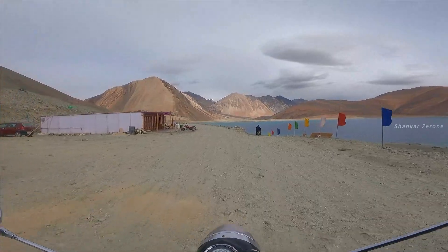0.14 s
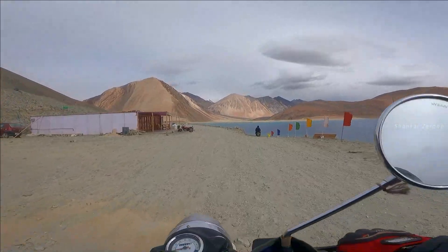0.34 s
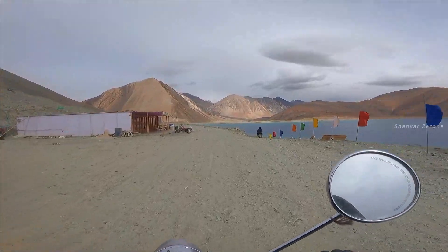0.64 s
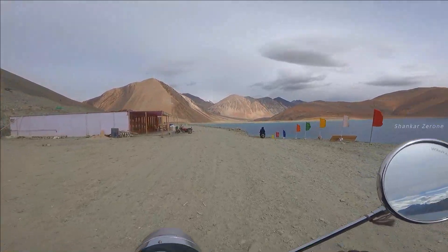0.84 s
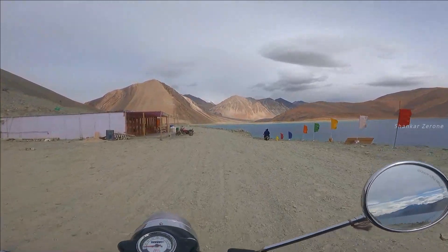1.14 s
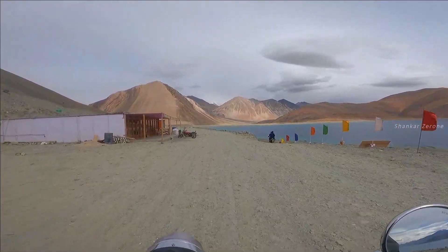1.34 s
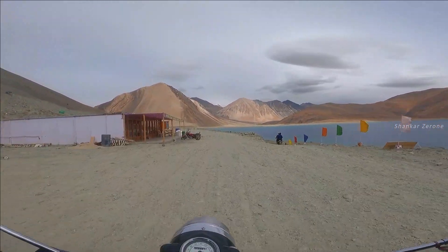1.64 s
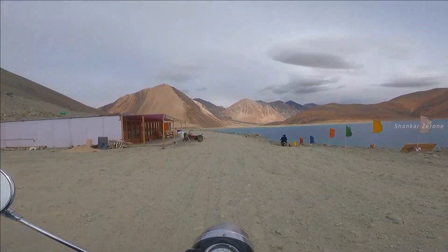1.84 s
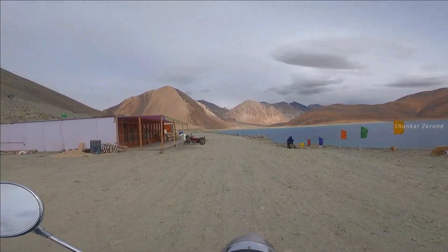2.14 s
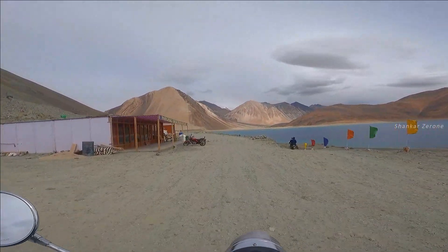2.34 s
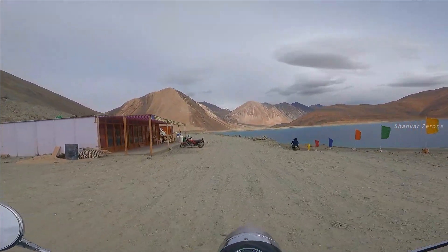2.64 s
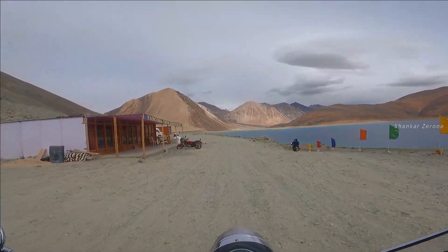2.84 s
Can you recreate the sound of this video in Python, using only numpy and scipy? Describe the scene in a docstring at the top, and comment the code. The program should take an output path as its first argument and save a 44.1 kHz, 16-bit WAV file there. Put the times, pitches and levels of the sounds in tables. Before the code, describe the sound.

A single-cylinder motorcycle thumps close by, slow and low, with light valve clatter, over rumbling, crunching tyres and wind buffeting the microphone. Bumps give dull thuds in the first half second. From about 0.7 to 1.2 seconds the engine softens and stones click sharply against the metal. After 1.8 seconds the throttle opens and the beat grows louder and faster until 3 seconds, with a gravel scrape and pebble snaps.

```python
"""A gravel track, from the rider's seat of a big single-cylinder motorcycle plodding along.
Close by, each slow firing thumps the exhaust and puffs gas, and the valve gear clacks;
after 1.8 s the throttle opens and the beat quickens. Below, the tyres rumble and crunch,
pebbles snap and stones tick against the bike. Air buffets the microphone into its limiter."""
import sys
import numpy as np
from scipy import signal
from scipy.fft import rfft, irfft
from scipy.io import wavfile
from scipy.ndimage import uniform_filter1d, minimum_filter1d

SR = 44100
rng = np.random.default_rng(int(sys.argv[2]) if len(sys.argv) > 2 else 0)


def to_wav(s):
    """Save 16-bit WAV."""
    ch = np.atleast_2d(s).T  # columns
    pcm = np.round(np.clip(ch, -1, 1) * 32767)  # PCM
    wavfile.write(sys.argv[1], SR, pcm.astype(np.int16))


N = 132300

# wind on the microphone: time_s, level_db
WIND_LEVEL = [(0, -26), (.1, -22), (.19, -9.5), (.3, -18), (.44, -12), (.54, -11), (.64, -25), (1.0, -19),
              (1.3, -23), (1.57, -17), (1.7, -27), (1.88, -16), (1.98, -12), (2.08, -22), (2.45, -16),
              (2.7, -15), (3, -18)]
# tyres rolling: time_s, level_db
ROLLING_LEVEL = [(.02, -19), (.1, -23), (.21, -19), (.28, -27.5), (.36, -22.5), (.46, -20.5), (.55, -20.5),
                 (.61, -26), (.78, -23), (1.0, -21.5), (1.1, -25.5), (1.2, -22.5), (1.45, -27.5),
                 (1.54, -23), (1.62, -28.5), (1.71, -28.5), (1.81, -23.5), (2.0, -25), (2.18, -29),
                 (2.26, -21.5), (2.45, -22), (2.59, -26.5), (2.78, -20.5), (2.88, -30), (2.94, -22)]
# gravel crunching: time_s, level_db
GRAVEL_LEVEL = [(.05, -47.5), (.19, -46.5), (.28, -39.5), (.36, -45.5), (.5, -47), (.68, -49.5),
                (.8, -43.5), (.92, -46), (1.06, -53.5), (1.2, -39), (1.26, -51), (1.38, -43), (1.5, -49),
                (1.69, -52.5), (1.77, -40.5), (1.83, -40), (1.93, -49.5), (2.16, -48.5), (2.28, -48.5),
                (2.44, -44), (2.58, -46.5), (2.76, -43.5), (2.89, -48), (2.95, -42.5)]
# sprays of grit: start_s, level_db, decay_s
GRIT_SPRAYS = [(0, -59.5, .3), (.228, -52, .08), (.45, -64.5, 0.12), (.574, -60, 0.32), (.7, -52, 0.033),
               (.75, -58, 0.093), (1.11, -56, 0.1), (1.744, -60.5, 0.059)]
# thin squeal: time_s, level_db
SQUEAL_FADE = [(0, -63), (.18, -65), (.26, -78), (.35, -110)]
# engine speed: time_s, firing_rate_hz
FIRING_RATE = [(0, 8.19), (.35, 8.11), (.63, 7.25), (.85, 7.55), (1.35, 7.21), (1.83, 7.54), (2.05, 9.95),
               (2.45, 11.93), (3.0, 14.54)]
# strength of the firings: time_s, gain_db
FIRING_STRENGTH = [(.05, -3), (.17, -3), (.42, -5), (.55, -4.5), (.7, -10), (1.1, -11), (1.36, -4.5),
                   (1.5, -9.5), (1.63, -8.5), (1.76, -4.5), (1.89, -0.5), (2.0, -3), (2.2, 3.5), (2.29, 4),
                   (2.47, 5.5), (2.56, 0), (2.7, 2.5), (2.82, -3), (2.93, 1)]
# exhaust pipe resonances: pitch_hz, gain_db, t60_s
PIPE_MODES = [(56, -2.5, 0.094), (91.2, 4.5, 0.057), (120.8, -3.5, 0.13)]
# valve-gear clacks: cycle_share, gain_db
VALVE_CLACKS = [(.29, -30.5), (.38, -34)]
# the frame thudding over bumps: start_s, level_db, decay_s
FRAME_THUDS = [(.155, -16, .025), (.205, -9, 0.026), (0.391, -9.5, 0.028), (.485, -13, 0.018),
               (.75, -19.5, 0.019), (2.23, -18, .03)]
# short high metallic chinks: start_s, pitch_hz, level_db, decay_s
METALLIC_CHINKS = [(.232, 8000, -48, .008), (0.575, 4100, -43, 0.0046), (.668, 2580, -43, 0.0049),
                   (0.953, 2860, -16, 0.0021), (1.016, 4000, -43, 0.0061), (1.199, 4950, -31, 0.0014),
                   (2.488, 8200, -58, .005), (2.631, 7400, -55, .003), (2.648, 7700, -55, .004),
                   (2.724, 7850, -52, 0.0045), (2.802, 8100, -59, .004), (2.872, 7700, -56, .003)]
# stones striking the bike: start_s, tick_db, knock_db
STONE_HITS = [(0.7283, -18.5, -16.5), (0.8514, -34, -24), (.953, -22, -22), (1.031, -51, -42),
              (1.1063, -24.5, -32), (1.1686, -38, -32.5), (1.191, -46, -32), (1.208, -55, -30.5),
              (1.217, -46, -48), (2.4183, -42, -50)]
# struck metalwork resonances: pitch_hz, relative_to_knock_db, t60_s
METAL_MODES = [(1066, -10.5, .045), (1450, -7, .045), (2070, -14.5, 0.019), (2680, -15, .016),
               (3160, -13.5, .014), (3570, -16, 0.02), (4000, -20.5, 0.017), (4750, -19, .013),
               (5420, -20, .013), (7750, -14, .008)]
# tyres scraping through loose gravel: start_s, end_s, level_db
TYRE_SCRAPES = [(0.744, 1.03, -35), (2.22, 2.486, -32.5)]
# pebbles under the tyres: start_s, peak_db, tilt_db_per_octave
PEBBLE_SNAPS = [(1.1958, -26, 3), (1.406, -33, 3), (1.597, -27, -2), (1.747, -30, -5), (1.837, -31, -5),
                (2.025, -31, -4.5), (2.4323, -22.5, -1)]

# The tone of each source at the microphone: frequency_hz, relative_density_db
WIND_SPECTRUM = [(6, -25), (15, -4), (25, -1), (40, -7), (80, -15), (130, -26.5), (250, -38), (600, -68)]  # deep buffeting
RUMBLE_SPECTRUM = [(25, -12), (60, 1), (100, 2), (160, 1.5), (270, 3), (380, -0.5), (510, -2), (750, -10.5),
                   (1100, -23), (2000, -34), (5000, -51.5)]  # rolling tyres
CRUNCH_SPECTRUM = [(300, -11), (900, 3), (1500, 2.5), (2200, -4), (2800, -7.5), (3500, -16), (4800, -23),
                   (6500, -28), (8000, -29.5), (11000, -36), (16000, -41)]  # crushed gravel
GRIT_SPECTRUM = [(1000, -7), (3000, 0.5), (5000, -0.5), (6500, -4), (8100, -2.5), (10000, -8), (13000, -15),
                 (16000, -21)]  # bright spray
SQUEAL_SPECTRUM = [(11800, -21.5), (12750, -3), (13300, -5.5), (14400, -21)]  # narrow, very high band
DRONE_SPECTRUM = [(32, -23.5), (50, -5), (75, 4.5), (120, 0.5), (150, -6), (260, -25)]  # low drone of the pipe
PUFF_SPECTRUM = [(50, -1), (110, 2.5), (190, 6), (300, -3.5), (480, -9.5), (900, -23), (2500, -38),
                 (5000, -62), (16000, -70)]  # exhaust gas
VALVE_SPECTRUM = [(250, 4), (500, 6.5), (800, -7.5), (1500, -18.5), (2800, -29.5), (4600, -40),
                  (6500, -41.5), (7900, -42.5), (10000, -60.5), (16000, -59)]  # clacking valve gear
THUD_SPECTRUM = [(110, -17.5), (200, -0.5), (270, -1), (370, -5), (520, -16), (900, -32.5)]  # jolted frame
TICK_SPECTRUM = [(1500, -7), (3000, 0.5), (4900, 0.5), (6300, -12.5), (7100, -4), (7800, 9.5), (8900, -3),
                 (10000, -5.5), (12500, -10), (15500, -14)]  # bright edge of a stone hit
KNOCK_SPECTRUM = [(400, -14), (850, -2), (1100, 3.5), (1270, -6), (1500, 2), (2200, -2), (2700, -8.5),
                  (4500, -15.5), (6500, -27)]  # body of a stone hit
SCRAPE_SPECTRUM = [(600, -26.5), (800, 10.5), (950, 5), (1150, -4), (1400, -8.5), (2500, -39.5)]  # hollow tyre scrape
SNAP_SPECTRUM = [(1200, -2.5), (2500, 6.5), (4500, 1), (8000, -5), (16000, -10)]  # pinched pebble, before its tilt

FIRST_FIRING_S = .0407
GRAVEL_GRAINS_PER_S, GRAVEL_SPREAD_DB = 4000, 2.5


def undb(db):
    """Decibels to gain."""
    return 10 ** (np.asarray(db) / 20)


def curve(rows):
    """Rows of time_s, value joined by straight lines."""
    return np.interp(np.arange(N) / SR, *np.array(rows).T)


def colour(x, spectrum):
    """Filter a sound by a spectrum, rolled off past its ends; the result has rms 1."""
    hz, db = np.array(spectrum, float).T
    f = np.maximum(np.arange(N // 2 + 1) * SR / N, 1)
    gain = undb(np.interp(np.log(f), np.log(hz), db))
    rolloff = np.minimum(f / hz[0], 1) ** 2 * np.minimum(hz[-1] / f, 1) ** 2
    y = irfft(rfft(x) * gain * rolloff, N)
    return y / y.std()


def noise(spectrum):
    """Coloured noise at rms 1."""
    return colour(rng.standard_normal(N), spectrum)


def drift(rate_hz):
    """Smooth random drift with a spread of 1."""
    hold = int(SR / rate_hz)
    steps = np.repeat(rng.standard_normal(N // hold + 1), hold)
    y = uniform_filter1d(uniform_filter1d(steps, hold), hold)[:N]
    return y / y.std()


def grains(per_s, spread_db):
    """Random clicks, many small and a few large."""
    size = undb(spread_db * np.minimum(rng.exponential(size=N), 6))
    return (rng.random(N) < per_s / SR) * size * rng.choice([-1, 1], N)


def burst(start_s, rise_s, decay_s):
    """An envelope that rises quickly and dies away."""
    age = np.maximum(np.arange(N) / SR - start_s, 0)
    return (1 - np.exp(-age / rise_s)) * np.exp(-age / decay_s)


def cycle_times(share):
    """The moments at which the engine passes a given share of its cycle."""
    t = np.arange(N) / SR
    cycles = np.cumsum(curve(FIRING_RATE)) / SR
    cycles -= np.interp(FIRST_FIRING_S, t, cycles)
    return np.interp(np.arange(share, cycles[-1]), cycles, t)


def wind():
    """Air buffets the microphone itself, over a slow swing of pressure."""
    sway_hz = 6.4 * (1 + .362 * drift(rate_hz=14))
    sway = np.sin(2 * np.pi * np.cumsum(sway_hz) / SR)
    return noise(WIND_SPECTRUM) * undb(curve(WIND_LEVEL)) + undb(-5) * sway


def tyre_rumble():
    """The tyres roll over the track below the seat with an uneven rumble."""
    return noise(RUMBLE_SPECTRUM) * undb(curve(ROLLING_LEVEL))


def gravel_crunch():
    """Gravel under the tyres gives dense clicks that merge into a fluttering crunch."""
    crunch = colour(grains(GRAVEL_GRAINS_PER_S, GRAVEL_SPREAD_DB), CRUNCH_SPECTRUM)
    flutter_db = 2.4 * drift(rate_hz=180)
    return crunch * undb(curve(GRAVEL_LEVEL) + flutter_db)


def grit_sprays():
    """The tyres throw fine grit in sudden sprays of tiny clicks."""
    sprays = sum(undb(db) * burst(start, .0024, decay) for start, db, decay in GRIT_SPRAYS)
    return sprays * colour(grains(per_s=3000, spread_db=1), GRIT_SPECTRUM)


def squeal():
    """A faint high squeal, as of a rubbing brake, fades out early on."""
    return noise(SQUEAL_SPECTRUM) * undb(curve(SQUEAL_FADE))


def pipe_drone():
    """The pipe drones roughly between beats, partly following the strength of the firings."""
    return noise(DRONE_SPECTRUM) * undb(-26.5 + .45 * curve(FIRING_STRENGTH))


def exhaust():
    """Each firing rings the pipe for a few cycles and lets out a puff of gas."""
    attack_s, puff_decay_s, puff_db = .009, .017, -12
    scatter_db, pitch_scatter, length_scatter = 1.3, .055, .15
    t = np.arange(N) / SR
    thumps, gas = np.zeros(N), np.zeros(N)
    for start in cycle_times(0):
        strength = undb(np.interp(start, *np.array(FIRING_STRENGTH).T) + rng.normal(0, scatter_db))
        tuning = rng.normal(1, pitch_scatter)
        stretch = np.exp(rng.normal(0, length_scatter))
        for k, (hz, db, t60) in enumerate(PIPE_MODES):
            ring = np.sin(2 * np.pi * hz * tuning * (t - start))
            envelope = burst(start, attack_s, t60 * stretch / np.log(1000))
            thumps -= (-1) ** k * strength * undb(db) * ring * envelope  # modes alternate in sign
        gas += strength * burst(start + attack_s / 2, attack_s, puff_decay_s)
    return thumps + undb(puff_db) * gas * noise(PUFF_SPECTRUM)


def valves():
    """The valve gear clacks twice a cycle, more softly as the beat quickens."""
    db_per_hz, reference_hz = -.36, 11.7
    clacks = sum(undb(db + rng.standard_normal()) * burst(start, rise_s=.00026, decay_s=.014)
                 for share, db in VALVE_CLACKS for start in cycle_times(share))
    return clacks * noise(VALVE_SPECTRUM) * undb(db_per_hz * (curve(FIRING_RATE) - reference_hz))


def frame_thuds():
    """Bumps in the track jolt dull thuds out of the frame."""
    jolts = sum(undb(db) * burst(start, .0093, decay) for start, db, decay in FRAME_THUDS)
    return jolts * noise(THUD_SPECTRUM)


def metallic_chinks():
    """Short high metallic chinks: the louder ones ring from stones striking the bike, and after 2.4 s faint
    ones near 8 kHz tick along with the engine."""
    t = np.arange(N) / SR
    return sum(undb(db) * burst(start, .00069, decay) * np.sin(2 * np.pi * hz * t)
               for start, hz, db, decay in METALLIC_CHINKS)


def stone_hits():
    """Flung stones give a bright tick and a short knock, and leave the metalwork ringing briefly."""
    t = np.arange(N) / SR
    ticks, knocks, ring = np.zeros((3, N))
    for start, tick_db, knock_db in STONE_HITS:
        ticks += undb(tick_db) * burst(start, rise_s=.0001, decay_s=.001)
        knocks += undb(knock_db) * burst(start, rise_s=.00045, decay_s=.003)
        ringing = (t >= start) & (t < start + .1)
        age = t[ringing] - start
        tuning = rng.normal(1, .025)  # each struck spot has its own pitch
        for hz, db, t60 in METAL_MODES:
            mode = np.sin(2 * np.pi * hz * tuning * age) * np.exp(-np.log(1000) * age / t60)
            ring[ringing] += undb(knock_db + db + rng.standard_normal()) * mode
    return ticks * noise(TICK_SPECTRUM) + knocks * noise(KNOCK_SPECTRUM) + ring


def tyre_scrapes():
    """The tyres push through loose gravel with a hollow, grainy scrape."""
    fade_s = .017
    t = np.arange(N) / SR
    envelope = sum(undb(db) * np.clip(np.minimum(t - start, end - t) / fade_s, 0, 1)
                   for start, end, db in TYRE_SCRAPES)
    return envelope * colour(grains(GRAVEL_GRAINS_PER_S, GRAVEL_SPREAD_DB), SCRAPE_SPECTRUM)


def pebble_snaps():
    """A pebble pinched by a tyre gives one dry snap, some brighter than others."""
    snaps = np.zeros(N)
    for start, peak_db, tilt in PEBBLE_SNAPS:
        spectrum = [(hz, db + tilt * np.log2(hz)) for hz, db in SNAP_SPECTRUM]
        snap = colour(signal.unit_impulse(N, int(start * SR)), spectrum)
        snaps += undb(peak_db) * snap / snap.max()
    return snaps


def scene():
    """Engine, track and wind at one microphone at the rider's seat."""
    engine = exhaust() + pipe_drone() + valves()
    track = tyre_rumble() + frame_thuds() + gravel_crunch() + tyre_scrapes() + grit_sprays()
    strikes = stone_hits() + pebble_snaps() + metallic_chinks()
    return (engine + track + strikes + squeal() + wind())[None]


def record(dry):
    """Behind the microphone, a look-ahead limiter holds the peaks and a steep filter cuts the top."""
    ceiling, smoothing_s, top_hz = .99, .008, 16300
    span = int(smoothing_s * SR)
    needed_gain = np.minimum(1, ceiling / (np.abs(dry) + 1e-9))
    held_gain = minimum_filter1d(needed_gain, 2 * span)
    gain = uniform_filter1d(uniform_filter1d(held_gain, span), span)
    lowpass = signal.ellip(8, .2, 70, top_hz, fs=SR, output="sos")
    return signal.sosfilt(lowpass, dry * gain)


dry = scene()
out = record(dry)
to_wav(out)
```